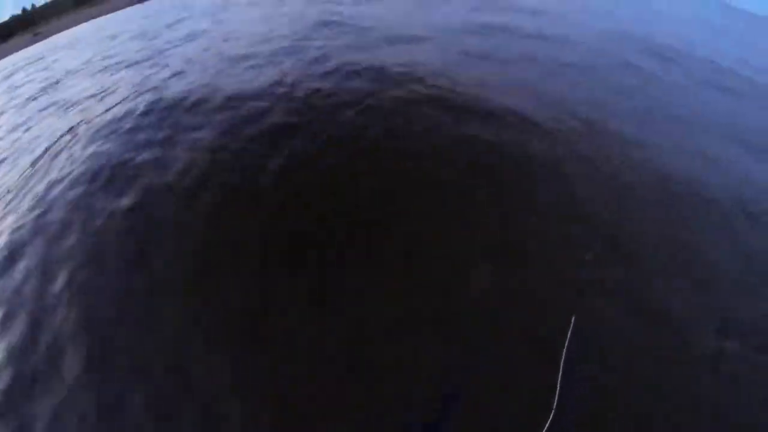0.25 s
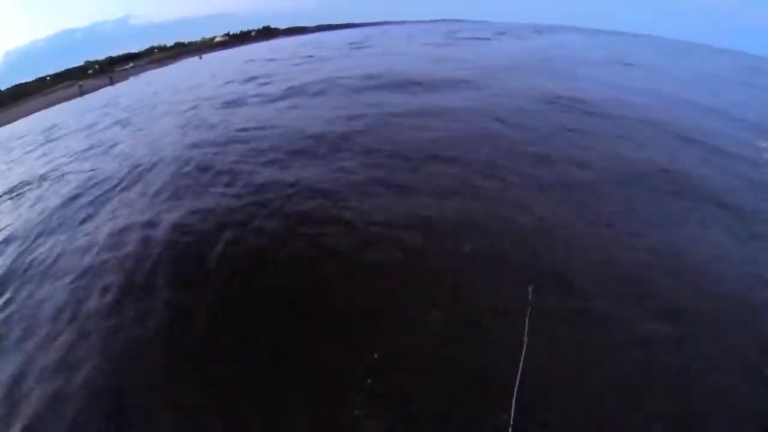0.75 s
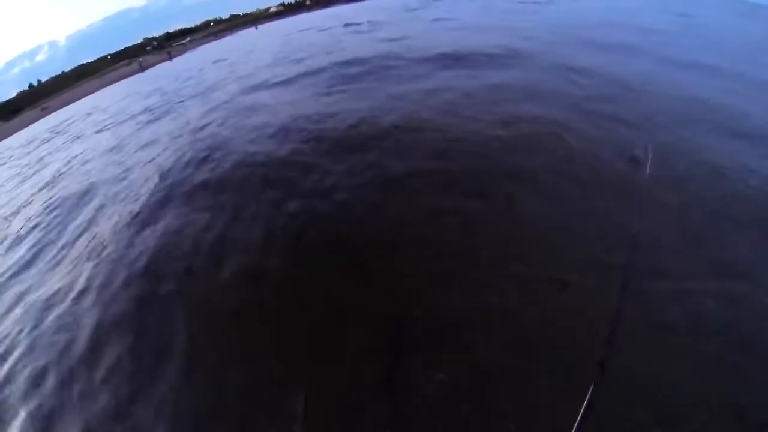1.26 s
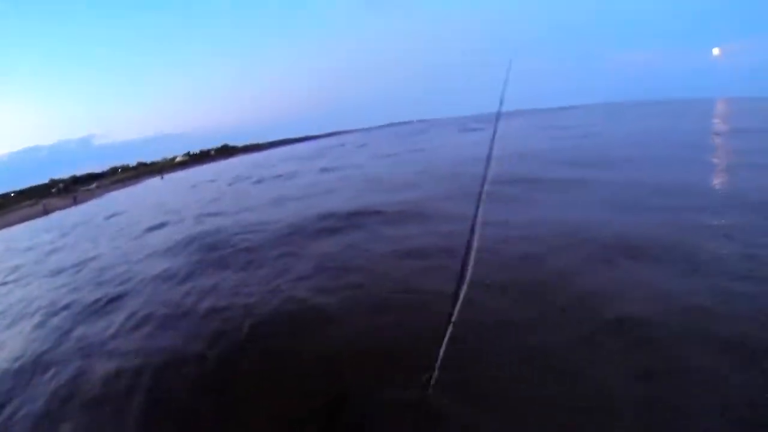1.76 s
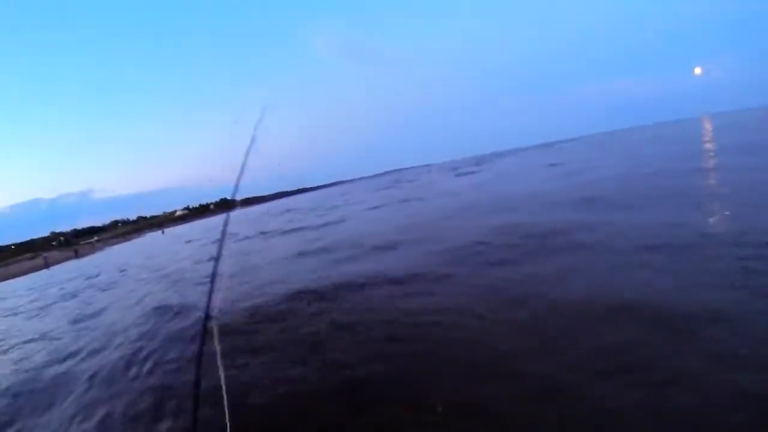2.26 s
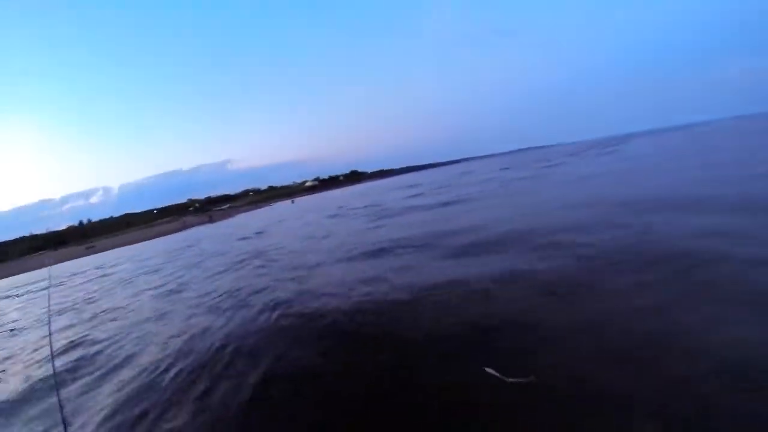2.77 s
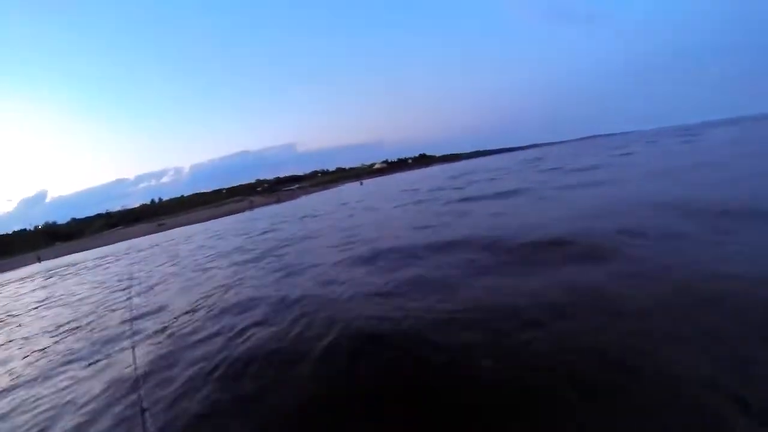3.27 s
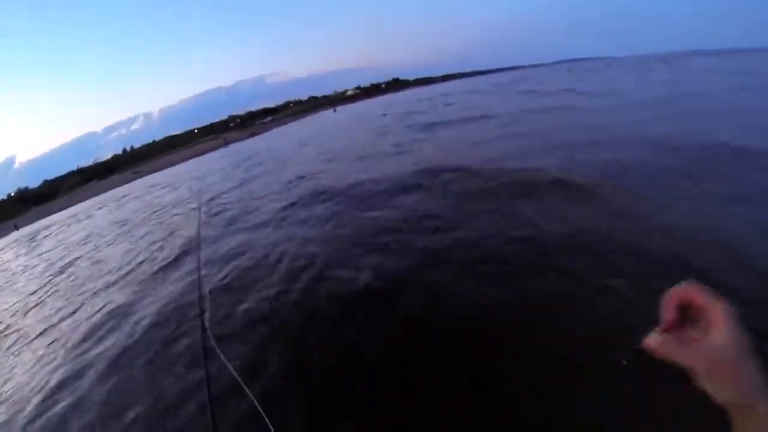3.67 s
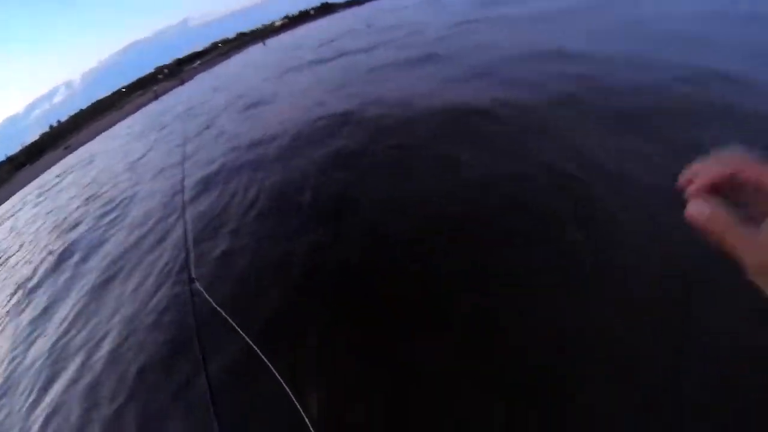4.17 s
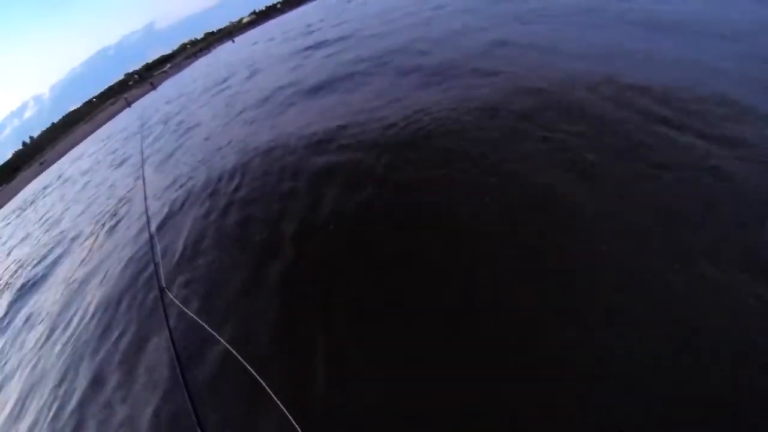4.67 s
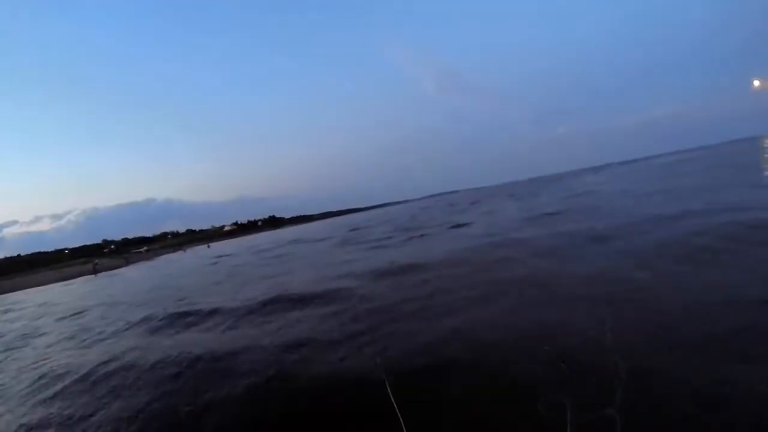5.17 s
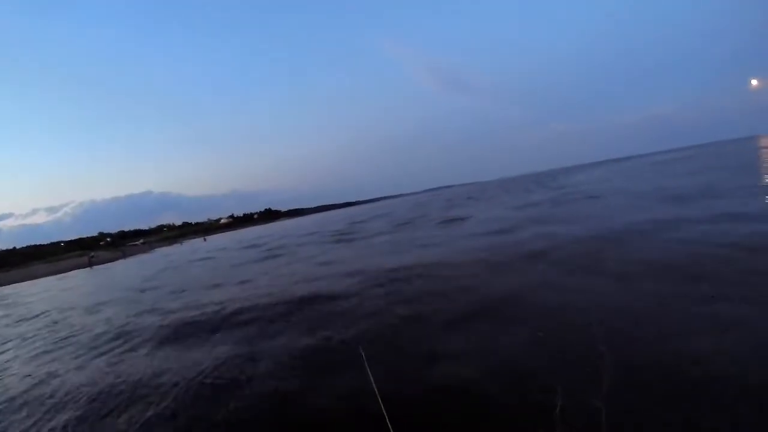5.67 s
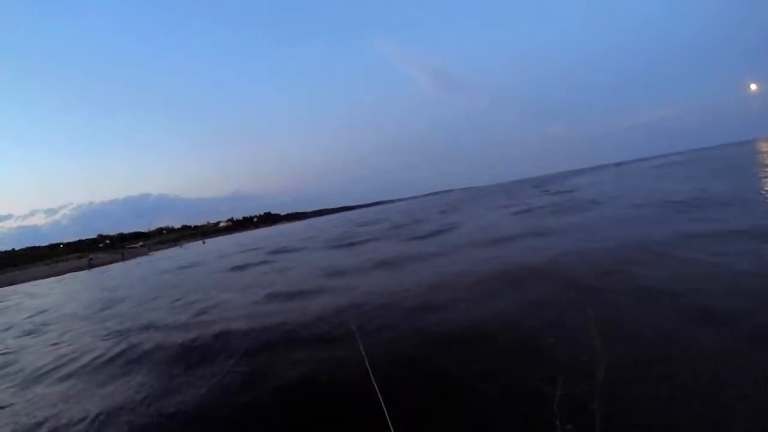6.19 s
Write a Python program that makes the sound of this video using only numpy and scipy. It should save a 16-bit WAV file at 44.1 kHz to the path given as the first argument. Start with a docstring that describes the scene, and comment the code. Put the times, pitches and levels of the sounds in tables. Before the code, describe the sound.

Standing in calm sea water, heard through a waterproof case worn on the body: small waves wash softly under low, uneven wind buffeting. A close splash with little plops and falling drops rings the case, followed by a smaller lap, a short faint falling whistle and soft air thumps. Gentle lapping carries on, growing slightly as the wind later drops. The microphone adds a steady hiss, a thin whine and tiny regular ticks.

```python
"""Standing in a calm sea at dusk with a fishing rod, heard by a body-worn camera in a waterproof case.
From the start gusts rumble on the case, small waves wash and the electronics hiss, whine and tick.
At 0.6 s a close slosh splatters and bubbles, muffled by the case, which rings near 1.4 kHz.
Near 2 s a faint whistle falls and air thumps on the case. Small laps follow to the end;
the wash swells from 3 s, and the rumble eases near 5 s."""
import sys
import numpy as np
from scipy import signal
from scipy.fft import rfft, irfft, next_fast_len
from scipy.io import wavfile
from scipy.ndimage import uniform_filter1d

SR = 44100
rng = np.random.default_rng(int(sys.argv[2]) if len(sys.argv) > 2 else 0)


def persist_wave(psi):
    """Save psi, clipped to +-1, as 16-bit WAV."""
    counts = np.round(np.clip(psi, -1, 1) * 32767).astype(np.int16)
    wavfile.write(sys.argv[1], SR, np.atleast_2d(counts).T)


N = 283563


def gain_of(db):
    """Decibels to amplitude."""
    return 10 ** (np.asarray(db) / 20)


def unit_rms(x):
    """Scales to rms 1."""
    return x / np.sqrt(np.mean(x ** 2) + 1e-20)


def curve(rows, column=1, lead_s=0):
    """One table column at every sample, read lead_s ahead."""
    columns = np.transpose(rows)
    return np.interp(np.arange(N) / SR + lead_s, columns[0], columns[column])


def add(mix, start_s, sound):
    """Mixes a sound in at start_s."""
    part = mix[max(round(start_s * SR), 0):][:len(sound)]
    part += sound[:len(part)]


def coloured(x, spectrum):
    """Filters x by a spectrum, rolling off above its last point; rms 1."""
    size = next_fast_len(N)
    points_hz, points_db = np.transpose(spectrum)
    hz = np.fft.rfftfreq(size, 1 / SR) + 1
    gain = gain_of(np.interp(np.log(hz), np.log(points_hz), points_db))
    gain *= np.minimum(points_hz[-1] / hz, 1) ** 2
    return unit_rms(irfft(rfft(x, size) * gain, size)[:N])


def drift(hz):
    """Random wander up to about hz; rms 1."""
    size = next_fast_len(N)
    lowpass = np.exp(-(np.fft.rfftfreq(size, 1 / SR) / hz) ** 2)
    return unit_rms(irfft(rfft(rng.standard_normal(size)) * lowpass, size)[:N])


def surges(rows, bed_db, column, rise=0.8, fall=0.87):
    """Envelope of a bed plus events that build and ebb, summed in power."""
    power = gain_of(bed_db) ** 2
    for row in rows:
        peak_s, width_s = row[:2]
        age = np.arange(-2 * width_s, 2 * width_s, 1 / SR) / width_s
        bell = np.exp(-(age / np.where(age < 0, rise, fall)) ** 2)
        add(power, peak_s - 2 * width_s, (gain_of(row[column]) * bell) ** 2)
    return np.sqrt(power)


def eddies(spectrum, steadiness):
    """Turbulence with its own swells partly levelled, so that gusts set its strength."""
    noise = coloured(rng.standard_normal(N), spectrum)
    power = uniform_filter1d(abs(signal.hilbert(noise)) ** 2, SR // 14)
    return unit_rms(noise / (power + 1e-6) ** (steadiness / 2))


# Large and small eddy spectra: freq_hz, density_db
RUMBLE_SPECTRUM = [(4, -8.5), (11, 4.5), (21, -5.5), (31, 0), (40, -7), (50, -16), (62, -31), (100, -62)]
BUFFET_SPECTRUM = [(35, -43.5), (65, 7.5), (110, 1), (160, -6), (250, -12.5), (500, -27.5), (1000, -23),
                   (3000, -46.5)]
# Wind strength: time_s, rumble_db, buffet_db
WIND_LEVELS = [(0, -44.5, -59.5), (.3, -44.5, -64), (.63, -51, -67), (.73, -44, -61.5), (1.05, -37, -63.5),
               (1.38, -44, -58), (1.5, -40, -67), (1.78, -40.5, -63), (2.25, -40.5, -57.5),
               (2.33, -38, -59.5), (2.42, -39.5, -68), (2.65, -42, -65.5), (3.05, -48.5, -63),
               (3.36, -49, -62), (3.52, -37.5, -62), (4.05, -38.5, -64), (4.55, -43, -65), (4.7, -38, -63),
               (4.92, -51.5, -65), (5.45, -49, -67), (5.85, -54, -67), (6.05, -49, -63),
               (6.43, -48.5, -60.5)]
# Single puffs: peak_s, width_s, rumble_db, buffet_db
WIND_PUFFS = [(.31, 0.035, -41, -59.5), (.46, 0.063, -42, -59), (.79, 0.07, -44.5, -57),
              (1.14, 0.12, -34.5, -64), (1.55, 0.097, -35, -54.5), (1.85, 0.08, -56, -57.5),
              (2.8, 0.18, -50, -60), (3.15, 0.062, -42, -55.5), (3.28, 0.035, -38, -57.5),
              (3.46, 0.05, -35, -61), (3.68, 0.021, -36, -55.5), (3.96, 0.08, -42, -57.5),
              (4.05, 0.06, -32, -64), (4.42, 0.049, -35, -71), (5.12, 0.066, -45, -69)]
# Air thumps: start_s, pitch_hz, length_s, level_db
AIR_THUMPS = [(2.003, 122, 0.036, -42), (2.204, 98, 0.027, -40), (2.255, 116, 0.021, -50)]
def wind(rumble_trim_db=-2, buffet_trim_db=-.5, thump_trim_db=-2, corner_hz=56):
    """Large eddies rumble on the case, smaller ones buffet it, a few hit as thumps."""
    gusting = drift(hz=18.6)
    rumble_db = curve(WIND_LEVELS, column=1) + rumble_trim_db + 3 * gusting
    buffet_db = curve(WIND_LEVELS, column=2) + buffet_trim_db + 1.05 * gusting
    rumble = eddies(RUMBLE_SPECTRUM, steadiness=0.6) * surges(WIND_PUFFS, rumble_db, column=2)
    buffet = eddies(BUFFET_SPECTRUM, steadiness=0.84) * surges(WIND_PUFFS, buffet_db, column=3)
    lowpass = signal.butter(3, corner_hz, fs=SR, output="sos")  # keeps sudden gusts deep
    out = signal.sosfiltfilt(lowpass, rumble, padtype=None) + buffet
    for start_s, pitch_hz, length_s, level_db in AIR_THUMPS:
        t = np.arange(int(length_s * SR)) / SR
        tone = np.sin(2 * np.pi * (pitch_hz * t + rng.random()))
        add(out, start_s, gain_of(level_db + thump_trim_db) * np.hanning(len(t)) * tone)
    return out


# Slow sea swell: time_s, wash_db, foam_db
SEA_SWELL = [(0, -63.5, -78), (.3, -64.5, -71), (.52, -67, -73), (1.3, -68.5, -74), (2.15, -69.5, -75),
             (2.8, -69.5, -73), (3.12, -65, -72), (3.5, -63.5, -69.5), (3.88, -63, -67),
             (4.1, -64.5, -67.5), (4.18, -60, -69), (4.5, -62.5, -71), (4.79, -61, -74), (4.88, -65.5, -71),
             (5.05, -65, -69.5), (5.25, -65.5, -72), (5.42, -67.5, -73.5), (6.43, -67.5, -72)]
# Close laps, the second is the slosh: peak_s, width_s, wash_db, foam_db, gurgle_db
WAVE_LAPS = [(.65, 0.098, -70, -73, -74), (.83, 0.16, -59, -68, -79), (1.11, 0.063, -84, -85, -65.5),
             (1.55, 0.1, -62, -74, -75), (1.67, 0.081, -82, -69.5, -72), (2.59, 0.094, -69, -69, -77),
             (3.6, 0.19, -80, -82, -73), (4.0, 0.073, -78, -73, -80), (6.04, 0.1, -61.5, -84, -76),
             (6.29, .05, -70, -69.5, -75)]
# Water through the case: freq_hz, density_db
WASH_SPECTRUM = [(150, -4), (350, -11.5), (600, -19), (1080, -19), (1190, -7.5), (1300, 1.5), (1400, 3),
                 (1590, 1.5), (1730, -10.5), (2000, -14), (2900, -25.5), (3650, -25), (4400, -36),
                 (9000, -38.5)]
def waves(trim_db=0.14, drops_per_s=900, drops_db=-5, flutter_db=1.5):
    """Ripples break into a fine wash full of tiny drops."""
    drops = unit_rms(rng.choice([-1, 1], N) * (rng.random(N) < drops_per_s / SR))
    wash = coloured(rng.standard_normal(N) + gain_of(drops_db) * drops, WASH_SPECTRUM)
    envelope = surges(WAVE_LAPS, curve(SEA_SWELL) + trim_db, column=2)
    return wash * envelope * gain_of(flutter_db * drift(hz=28.8))


# Case resonances: freq_hz, width_hz, gain_db
CASE_MODES = [(1336, 470, 10), (1580, 130, 11.5), (2350, 320, -8), (3580, 370, 3), (5240, 450, -8),
              (6900, 1700, -16), (11100, 800, -19)]
def ring_case(push, bright_db, treble_hz=2000):
    """A push rings the modes of the case; a sharper push favours the upper ones."""
    out = np.zeros(len(push))
    for freq_hz, width_hz, gain_db in CASE_MODES:
        radius = np.exp(-np.pi * width_hz / SR)
        pole = radius * np.exp(2j * np.pi * freq_hz / SR)
        ring = push
        for _ in range(2):
            ring = 2 * signal.lfilter([1 - radius], [1, -pole], ring).real
        out += gain_of(gain_db + bright_db * (freq_hz > treble_hz)) * ring
    return out


# Splats of the slosh and later laps: start_s, peak_db, spray_s, bright_db, spray_ratio
WATER_SPLATS = [(0.6152, -43, 0.0022, 18, .03), (0.6205, -47, 0.0032, -8, .2), (0.628, -58, 0.0054, 22, .3),
                (0.67, -51, 0.0053, 4, .2), (0.722, -59, 0.0044, 22, 0.27), (0.756, -53, 0.003, -10, .1),
                (0.764, -56, 0.0022, -12, .1), (0.774, -54, .003, -14, .1), (0.8115, -45, 0.0028, -8, 0.43),
                (0.82, -41, .003, -11, .1), (0.834, -47, 0.0026, -10, 0.33),
                (0.841, -45.5, 0.0029, -4, .15), (0.853, -54, 0.0026, -2, .3), (0.860, -46, .002, -10, .1),
                (0.864, -44, 0.0018, -6, 0.17), (0.904, -46, 0.0065, -13, 0.2),
                (0.941, -64, 0.0045, 5, 0.43), (1.02, -55, 0.0043, 1, .2), (1.572, -55, 0.0049, -10, .2),
                (1.659, -59, 0.007, -6, .5), (2.586, -58, 0.0036, 8, .2)]
def splats():
    """A slap and a short spray of water ring the case."""
    out, t = np.zeros(N), np.arange(SR // 16) / SR
    for start_s, peak_db, spray_s, bright_db, spray_ratio in WATER_SPLATS:
        push = spray_ratio * rng.standard_normal(len(t)) * np.exp(-t / spray_s) * t / spray_s
        push[0] += 1  # slap
        ring = ring_case(push, bright_db)
        add(out, start_s, gain_of(peak_db) * ring / abs(ring).max())
    return out


def droplets(full_s=0.7, hold_s=0.335, hold_db=-67.5, rise_db_per_s=65, fall_db_per_s=280, per_s=550):
    """Drops falling back from the slosh patter on the case: build, hold, quick stop."""
    age_s = np.arange(N) / SR - full_s
    level_db = hold_db - rise_db_per_s * np.maximum(-age_s, 0)
    level_db -= fall_db_per_s * np.maximum(age_s - hold_s, 0)
    drops = rng.standard_normal(N) * (rng.random(N) < per_s / SR)
    return gain_of(level_db) * unit_rms(ring_case(drops, bright_db=2.5))


# Plops and chirps: start_s, pitch_hz, rise_ratio, length_s, peak_db
BUBBLE_CHIRPS = [(0.613, 1444, 0.12, 0.0098, -48), (0.661, 1400, .03, 0.0084, -46.5),
                 (0.675, 1273, 0.25, 0.0072, -42), (0.702, 1440, 0.091, 0.006, -45.5),
                 (0.8105, 1320, 0.075, 0.0096, -40), (1.534, 1556, .04, 0.02, -55),
                 (1.664, 1650, 0.033, 0.018, -57), (2.591, 1530, .05, 0.013, -58),
                 (2.64, 2480, .03, .014, -61.5), (2.659, 2710, 0.061, 0.028, -66),
                 (3.062, 1096, 0.39, 0.028, -57)]
def bubbles(wobble_ratio=0.041):
    """Wobbling bubbles ring, rising in pitch as they near the surface."""
    out, wobble = np.zeros(N), 1 + wobble_ratio * drift(hz=202)
    for start_s, pitch_hz, rise_ratio, length_s, peak_db in BUBBLE_CHIRPS:
        age = np.linspace(0, 1, int(length_s * SR))
        glide_hz = pitch_hz * (1 + rise_ratio * age) * wobble[int(start_s * SR):][:len(age)]
        tone = np.sin(2 * np.pi * np.cumsum(glide_hz) / SR)
        add(out, start_s, gain_of(peak_db) * np.sin(np.pi * age) * tone)
    return out


# Foam rush: freq_hz, density_db
FOAM_SPECTRUM = [(150, 3), (340, 3), (550, -1), (950, -11.5), (1400, 3), (2000, -2.5), (2400, 1.5),
                 (2900, -5.5), (3700, -13), (5000, -13.5), (9000, -41)]
def foam(flutter_db=1.5):
    """A broad soft rush runs ahead of the swell and flares with the laps."""
    rush = coloured(rng.standard_normal(N), FOAM_SPECTRUM)
    envelope = surges(WAVE_LAPS, curve(SEA_SWELL, column=2), column=3)
    return rush * envelope * gain_of(flutter_db * drift(hz=25.8))


# Churning water: freq_hz, density_db
GURGLE_SPECTRUM = [(120, -12), (220, -1.5), (400, -9.5), (540, -5), (700, -7.5), (1000, -28)]
def gurgle(level_db=-80, follow_ratio=0.85, swell_mean_db=-65, flutter_db=3):
    """Water churns low and unevenly ahead of the swell and under each lap."""
    bed_db = level_db + follow_ratio * (curve(SEA_SWELL, lead_s=0.74) - swell_mean_db)
    churn = coloured(rng.standard_normal(N), GURGLE_SPECTRUM)
    return churn * surges(WAVE_LAPS, bed_db, column=4) * gain_of(flutter_db * drift(hz=36.5))


# Thin whistle: time_s, pitch_hz, level_db
WHISTLE_GLIDE = [(1.95, 1372, -69), (1.975, 1385, -54.5), (1.995, 1406, -59), (2.03, 1340, -59),
                 (2.06, 1280, -69), (2.095, 1190, -71), (2.125, 1130, -85)]
def whistle(trim_db=0.5, waver_ratio=.002):
    """A nearly pure tone holds, then slides down."""
    t = np.arange(N) / SR
    pitch_hz = curve(WHISTLE_GLIDE, column=1) * (1 + waver_ratio * drift(hz=40))
    gate = (t > WHISTLE_GLIDE[0][0]) & (t < WHISTLE_GLIDE[-1][0])
    envelope = gate * gain_of(curve(WHISTLE_GLIDE, column=2) + trim_db)
    return envelope * np.sin(2 * np.pi * np.cumsum(pitch_hz) / SR)


# Electronic noise floor: freq_hz, density_db
HISS_SPECTRUM = [(60, 6.5), (300, -2), (550, -6), (1000, -9.5), (2300, -15.5), (2800, -16.5), (3700, -16),
                 (4400, -19), (6500, -22), (10500, -24.5), (11900, -31), (12700, -22.5), (14200, -25),
                 (15200, -21.5)]
def hiss(level_db=-63.5):
    """The electronics hiss steadily."""
    return gain_of(level_db) * coloured(rng.standard_normal(N), HISS_SPECTRUM)


FRAME_HZ = 59.9313
# Tones in each camera frame: start_frames, end_frames, pitch_hz, wander_hz, level_db
WHINE_TONES = [(0.082, 0.45, 7516, 110, -68), (0.556, 0.94, 7600, 240, -72.5), (0.11, 0.24, 8260, 150, -71)]
def whine():
    """The electronics whine in two bursts a frame."""
    out, frame_phase = np.zeros(N), (np.arange(N) / SR * FRAME_HZ) % 1
    for start_frames, end_frames, pitch_hz, wander_hz, level_db in WHINE_TONES:
        active = (frame_phase > start_frames) & (frame_phase < end_frames)
        gate = uniform_filter1d(active.astype(float), SR // 1000)
        cycles = np.cumsum(pitch_hz + wander_hz * drift(hz=341)) / SR
        out += gate * gain_of(level_db) * np.sin(2 * np.pi * cycles)
    return out


# Switching buzz: freq_hz, density_db
BUZZ_SPECTRUM = [(1500, -13.5), (2600, -12), (3000, -1), (3300, -2), (3600, -2), (4300, -11), (5150, -9),
                 (6200, -17), (9500, -11), (12000, -16), (13400, -15.5), (15200, -14)]
def buzz(level_db=-77, crackle_ratio=1.3):
    """The electronics switch twice a frame, each time with the same short burst plus fresh crackle."""
    frames = np.arange(N) / SR * FRAME_HZ
    switches = np.diff(np.floor(2 * frames + 1 / 12), prepend=0)
    decay = np.exp(-np.linspace(0, 2, SR // 330))
    bursts = unit_rms(signal.oaconvolve(switches, decay * rng.standard_normal(len(decay)))[:N])
    crackle = unit_rms(signal.oaconvolve(switches, decay)[:N] * rng.standard_normal(N))
    return gain_of(level_db) * coloured(bursts + crackle_ratio * crackle, BUZZ_SPECTRUM)


# Runs of ticks: start_s, end_s
TICK_SPANS = [(0.1845, 4.75), (5.0563, 6.4)]
def ticks(level_db=-65, pitch_hz=8270, length_s=0.009, period_frames=15):
    """A tiny high electrical tick, four times a second."""
    out, t = np.zeros(N), np.arange(int(length_s * SR)) / SR
    pip = gain_of(level_db) * np.sin(2 * np.pi * pitch_hz * t) * signal.windows.tukey(len(t), .5)
    for start_s, end_s in TICK_SPANS:
        for tick_s in np.arange(start_s, end_s, period_frames / FRAME_HZ):
            add(out, tick_s, pip)
    return out


def scene():
    """Wind, water and a whistle over the camera's own noise; mono."""
    water = waves() + splats() + droplets() + bubbles() + foam() + gurgle()
    electronics = hiss() + whine() + buzz() + ticks()
    return (wind() + water + whistle() + electronics)[None]


def record(dry, cutoff_hz=15330):
    """The camera's band limit."""
    lowpass = signal.firwin(801, cutoff_hz, window=("kaiser", 9), fs=SR)
    return signal.oaconvolve(dry, lowpass[None], "same")


dry = scene()
out = record(dry)
persist_wave(out)
```